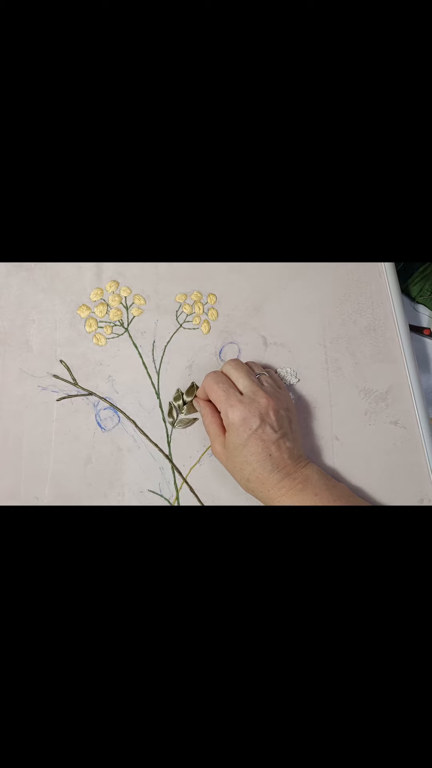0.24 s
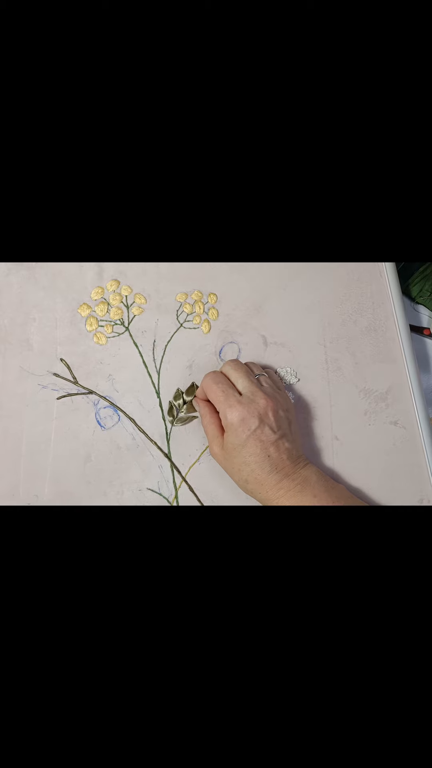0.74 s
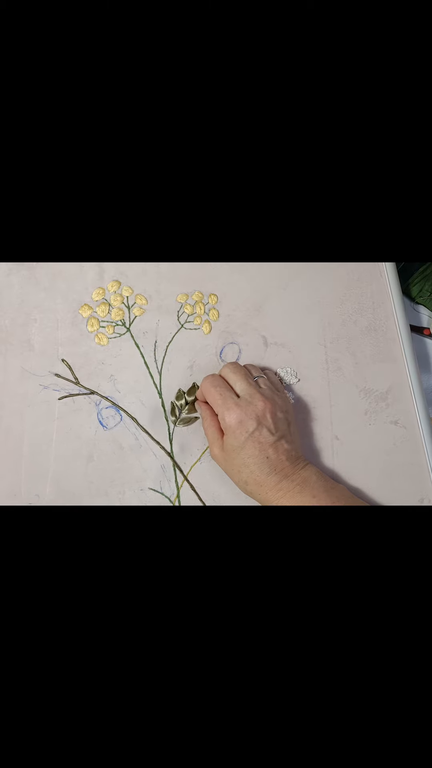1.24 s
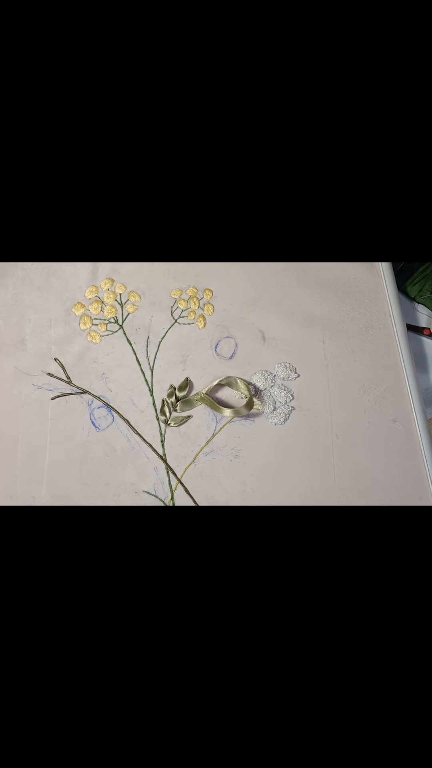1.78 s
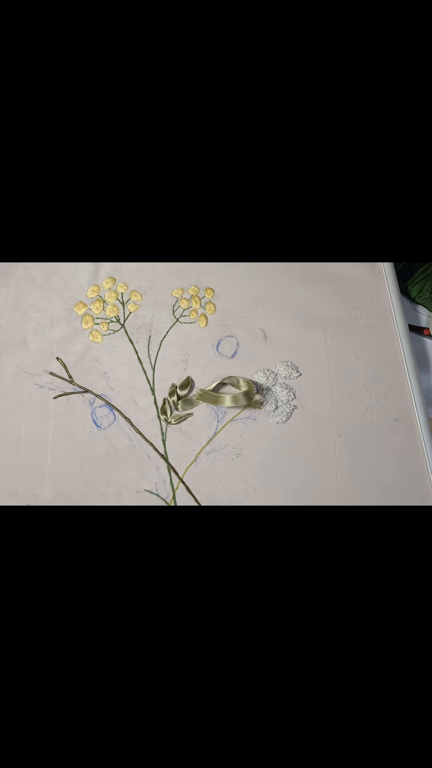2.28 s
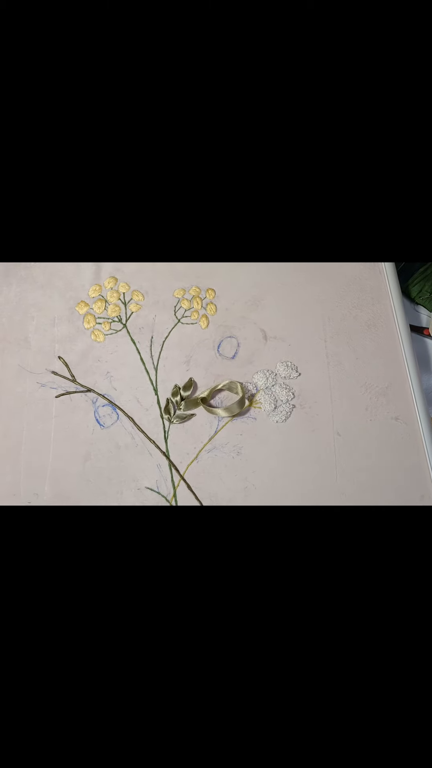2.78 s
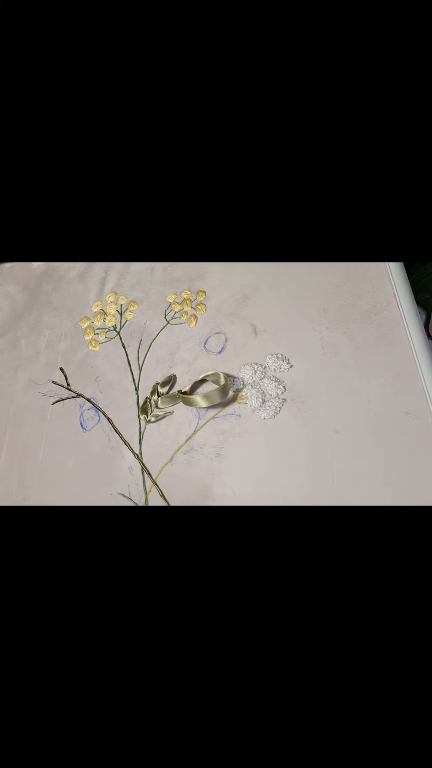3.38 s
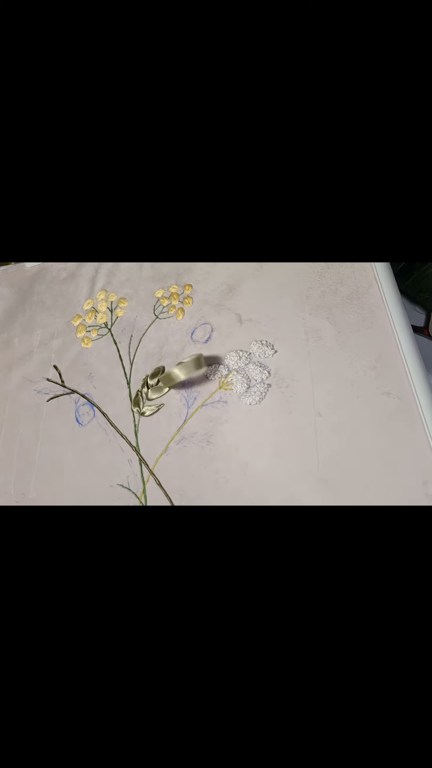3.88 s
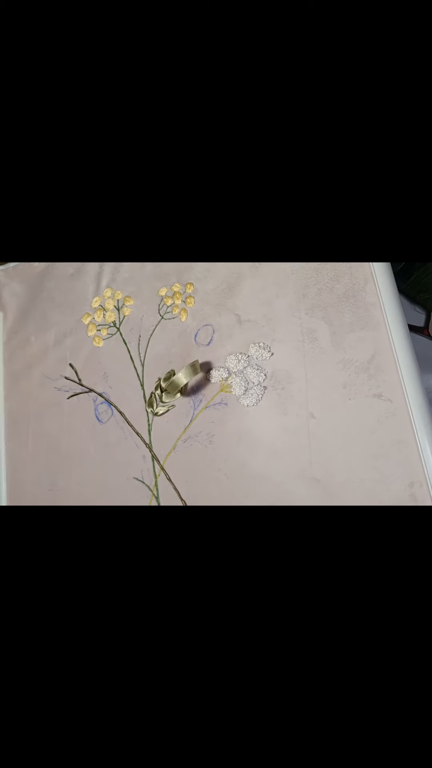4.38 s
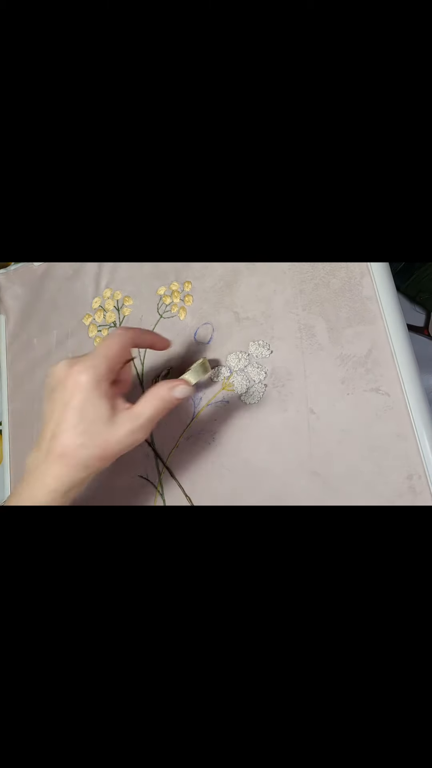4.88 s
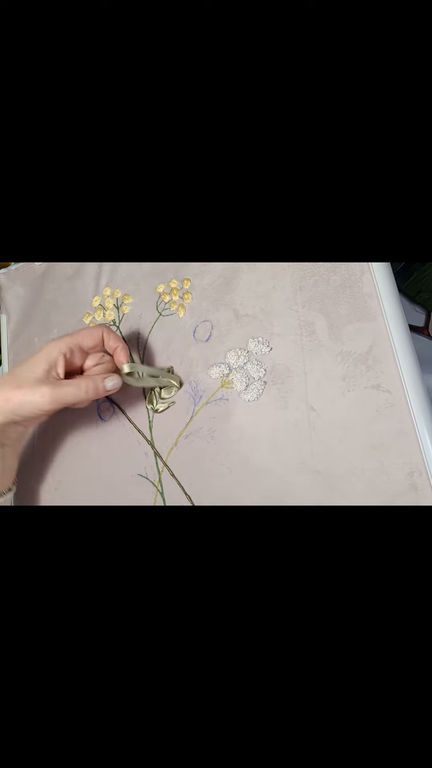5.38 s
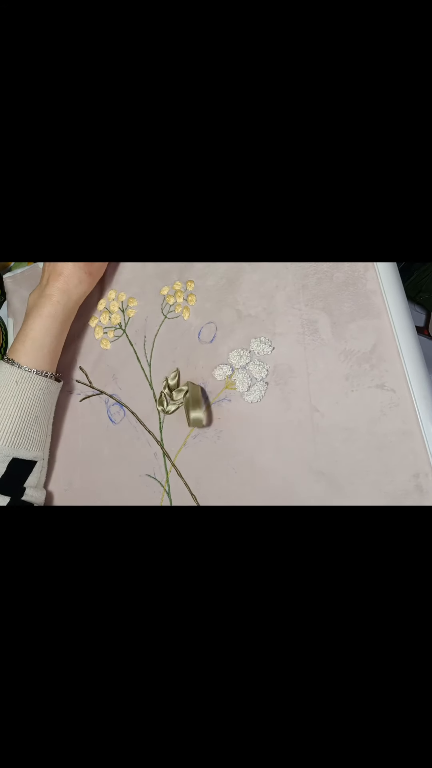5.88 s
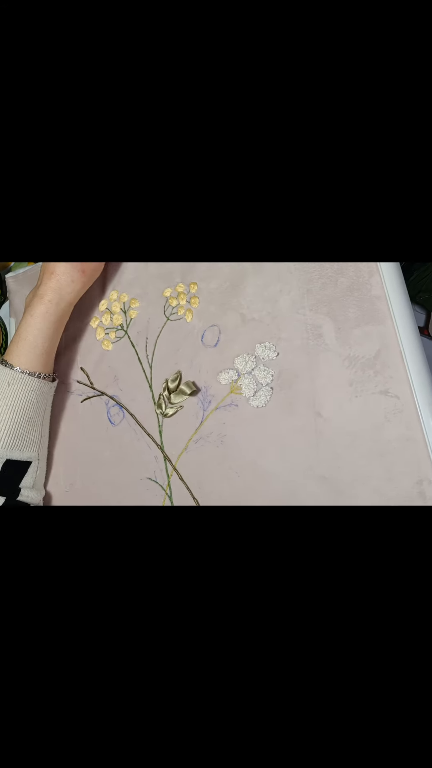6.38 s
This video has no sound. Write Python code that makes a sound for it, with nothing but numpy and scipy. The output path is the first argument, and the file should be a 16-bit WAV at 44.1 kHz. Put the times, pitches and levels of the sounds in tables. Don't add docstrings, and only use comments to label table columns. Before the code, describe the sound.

A needle works through drum-tight cloth: soft rasping brushes, one very sharp loud pop, then dull thumps and quick ribbon tugs in a quiet room.

```python
import sys
import numpy as np
from scipy import signal
from scipy.fft import rfft, irfft
from scipy.io import wavfile
from scipy.ndimage import uniform_filter1d

SR = 44100
rng = np.random.default_rng(int(sys.argv[2]) if len(sys.argv) > 2 else 0)


def volts_from_db(level):
    exponent = np.asarray(level, float) / 20
    return 10 ** exponent


def transcribe(u):
    v = np.clip(np.atleast_2d(u).T, -1, 1)
    q = np.round(v * 32767).astype(np.int16)
    wavfile.write(sys.argv[1], SR, q)


N = 292868

# pitch_hz, density_db_per_hz
PORT_HISS = [(12, -21), (20, 3.5), (49, -13.5), (163, -18), (434, -22.5), (1220, -28.5), (2820, -29.5),
             (6360, -37), (7520, -38), (15800, -41), (16600, -72.5)]
# pitch_hz, t60_s
ROOM_T60 = [(60, 0.51), (300, 0.42), (1000, 0.27), (3000, 0.26), (8000, 0.29), (16000, .18)]
# pitch_hz, likeness_0_to_1
ROOM_ALIKE = [(60, 0.83), (300, 0.82), (700, 0.27), (1500, 0.25), (16000, 0.0068)]
# pitch_hz, level_db
ROOM_DB = [(60, -5), (300, -5), (1000, -5), (3000, -4), (8000, -6.5), (16000, -9.5)]
# time_s, escape_db
ESCAPE = [(0.0, -4.5), (1.3, 0.5), (1.55, -12.5), (1.6, -3), (2.6, -7), (3.4, 2.5), (3.47, -2.2), (5.7, -2),
          (6.64, -1.5)]
# direct_lag_samples, level_db, glance_lag_samples, glance_share
PORTS = [
    (5, -1.2, 10, .3),
    (0, 1.2, 8, .3),
]

# pitch_hz, density_db_per_hz
SWAY_COLOUR = [(15, 7), (30, -8.5), (70, -4.5), (150, -13.5), (300, -14), (20000, -99)]
RUB_COLOUR = [(60, -10), (180, -8), (300, -5.5), (500, 4), (800, -6.5), (1300, -27), (20000, -101.5)]
RASP_COLOUR = [(400, -18), (1000, -3.5), (2000, -4.5), (3300, 3), (5000, -7), (7000, -19), (20000, -58)]
FIBRE_COLOUR = [(3000, -13), (5800, -7.5), (7500, 2), (8800, -9.5), (11000, -14), (16000, -11.5),
                (20000, -51.5)]
# start_s, length_s, rub_db
PRESSES = [(0.508, 0.085, -64.5), (0.676, 0.13, -74), (0.858, 0.09, -57), (0.942, 0.08, -56.5),
           (1.202, 0.2, -65), (1.355, 0.13, -76), (1.877, 0.45, -75), (2.337, 0.24, -64), (2.55, 0.2, -67),
           (2.94, 0.33, -68), (3.347, 0.33, -55.5), (3.502, 0.19, -55), (3.7, 0.71, -70),
           (4.286, .3, -67.5), (5.142, 0.44, -71), (5.716, 0.27, -65), (5.903, 0.1, -54.5),
           (6.037, 0.14, -57), (6.098, 0.14, -48.5), (6.373, 0.18, -60.5), (6.546, .14, -59)]
# start_s, length_s, fibre_db, pressure_db (deepens hiss to rasp)
STROKES = [(0.171, 0.21, -72.5, -24), (0.437, .08, -83, -14), (0.527, 0.096, -74.5, -19),
           (0.633, 0.16, -71.5, -2.5), (0.842, 0.12, -65, 1), (0.943, 0.069, -71, 4), (1.053, 0.13, -65, 0),
           (1.218, 0.12, -64.5, -3.5), (1.395, .17, -65, 0.5), (1.564, 0.058, -70, 2),
           (1.646, .14, -70.5, -21), (2.357, 0.15, -77.5, 3.5), (2.863, 0.43, -74, 4),
           (3.356, 0.32, -65, -1), (3.49, 0.24, -68.5, -20), (3.607, 0.51, -74.5, 3.5),
           (3.926, 0.43, -70.5, 0), (4.31, 0.23, -67, 2.5), (4.69, .16, -77, -12.5), (5.039, .12, -70, -14),
           (5.157, 0.38, -72, -2.5), (5.49, 0.24, -80, -2), (5.692, .16, -69, -1),
           (5.831, 0.18, -66.5, 3.5), (5.97, 0.09, -62, -6), (6.383, 0.38, -71.5, 2.5)]
# start_s, end_s, rub_db, rasp_db, fibre_db
TUGS = [
    (1.349, 1.416, -49.5, -52.5, -70),
    (1.846, 1.904, -77, -65, -63.5),
    (2.538, 2.556, -60, -74, -60.5),
    (3.483, 3.533, -47.5, -59, -66),
    (3.572, 3.632, -56, -89, -101),
    (6.021, 6.075, -54, -64, -58),
    (6.131, 6.215, -53.5, -70, -56),
    (6.223, 6.244, -61, -85, -87.5),
    (6.327, 6.374, -51, -67, -59),
]

# pitch_hz, level_db,
# t60_s
CLOTH = [(251.6, -10.5, 0.089), (296, -5, 0.071), (390, 4.5, 0.026), (501.7, 0.5, 0.047), (618, 8, 0.023),
         (855, -2.5, 0.086)]
WEAVE = [(1037, -6.5, 0.019), (1108, -4, 0.018), (1348, 1.5, 0.015), (1690, -3, 0.02), (2570, -2, 0.0075),
         (2934, 18, 0.0021), (3770, 0, 0.0038)]
NEEDLE = [(2900, -2, .004), (3700, -3, .004), (4500, -2, .004), (5800, -4, .003), (7500, 0, .005),
          (8800, -6, .003), (11000, -16, .002)]
# start_s, peak_db, pitch_hz, t60_s
THUMPS = [(0.165, -83, 101, 0.13), (0.715, -55.5, 40.7, 0.19), (0.908, -51.5, 55, 0.071),
          (0.954, -49, 109.3, 0.13), (1.123, -55.5, 195, 0.061), (1.142, -43.5, 39.7, 0.075),
          (1.339, -58, 161.5, 0.36), (1.441, -47, 43.1, 0.068), (1.591, -45.5, 121, 0.13),
          (1.857, -41, 87, 0.067), (1.87, -41.5, 101, 0.063), (2.217, -67, 48.7, 0.069),
          (2.543, -44, 79.6, 0.06), (2.685, -54, 145.6, 0.051), (3.142, -48.5, 96, 0.037),
          (3.474, -42, 84, 0.2), (3.527, -41.5, 68.4, 0.07), (3.58, -38, 70, 0.06),
          (3.61, -51, 40.4, 0.083), (4.023, -57.5, 95, 0.13), (4.192, -73, 139, 0.17),
          (4.446, -61, 197, 0.071), (5.731, -49.5, 97, 0.048), (5.782, -47, 46.3, 0.061),
          (5.928, -43, 103, 0.045), (6.047, -48, 195, 0.08), (6.163, -43.5, 52, 0.1),
          (6.317, -48, 97, 0.046), (6.548, -51, 99, 0.086), (6.61, -53.5, 132, 0.17)]
# start_s, cloth_peak_db, cloth_pitch_hz
NUDGES = [(0.343, -57, 402), (0.606, -49.5, 383), (0.694, -55.5, 280), (0.838, -58, 295),
          (2.404, -54.5, 397), (2.485, -55, 290), (2.706, -50, 297), (3.023, -52, 457), (3.891, -50, 382),
          (4.035, -51, 282), (4.73, -62, 350), (4.899, -58, 352), (5.09, -57.5, 400), (5.64, -57, 390),
          (5.733, -55, 207), (5.774, -48, 335), (5.866, -52, 345), (6.612, -48, 263)]
# start_s, cloth_peak_db, cloth_pitch_hz, weave_knock_db, needle_tick_db
POKES = [(0.954, -37.5, 296, -43.5, -48.5), (1.122, -43.5, 307, -52.5, -54), (1.592, -37, 483, -43, -63),
         (1.842, -50.5, 414, -61.5, -38), (1.868, -32.5, 267, -60, -64), (1.88, -51, 328, -66, -44.5),
         (1.888, -40, 252, -54, -47), (2.545, -43.5, 404, -47, -65), (2.69, -39.5, 390, -52.5, -65),
         (3.468, -53, 202, -47, -70), (3.482, -31, 390, -25, -65), (3.503, -37.5, 274, -61, -60),
         (3.576, -30, 480, -30.5, -59), (4.078, -45, 355, -49, -73), (4.174, -47.5, 350, -51.5, -73),
         (4.206, -46, 372, -53, -74), (5.929, -40.5, 530, -50.5, -53), (6.035, -44, 520, -74, -51),
         (6.044, -27.5, 420, -36.5, -35), (6.123, -39, 417, -43, -45.5), (6.181, -46, 458, -44, -41),
         (6.318, -39.5, 620, -41, -64), (6.546, -44.5, 229, -56, -61)]
# peak_db, push_ms, recoil_ms, recoil_share, tick_db, ring_db
POP = (-8, 0.48, 1.25, 0.5, -21.5, -26.5)


def read(table, hz):
    f, v = np.transpose(table)
    return np.interp(np.log(np.maximum(hz, 1)), np.log(f), v)


def unit(x):
    return x / np.sqrt(np.mean(x ** 2))


def colour(x, table):
    gain = volts_from_db(read(table, np.fft.rfftfreq(N, 1 / SR)))
    return unit(irfft(rfft(x) * gain, N))


def walk(rate):
    hold = int(SR / rate)
    levels = np.repeat(rng.standard_normal(N // hold + 1), hold)
    return unit(uniform_filter1d(levels, hold)[:N])


def add(out, s, blow):
    i = int(s * SR)
    out[i:i + len(blow)] += blow


def near(modes, hz, db_per_octave):
    return [(f, db - db_per_octave * abs(np.log2(f / hz)), t60) for f, db, t60 in modes]


def ring(modes, contact_s, detune, scatter_db):
    hz, db, t60 = np.array(modes, float).T[:, :, None]
    t = np.arange(SR // 4) / SR
    level_chance, pitch_chance, phase_chance = rng.standard_normal((3, len(modes), 1))
    onset = 1 - np.exp(-t / np.clip(contact_s, 5e-5, .02))
    decay = np.exp(-np.log(1000) * t / t60)
    tone = np.sin(2 * np.pi * hz * (1 + detune * pitch_chance) * t + .5 * phase_chance)
    y = (volts_from_db(db + scatter_db * level_chance) * onset * decay * tone).sum(axis=0)
    return y / np.abs(y).max()


def crack(top_hz):
    t = np.arange(SR // 50) / SR
    y = rng.standard_normal(len(t)) * np.exp(-np.log(1000) * t / .005)
    y = signal.sosfilt(signal.butter(2, [600, top_hz], "band", fs=SR, output="sos"), y)
    return y / np.abs(y).max()


def port_hiss():
    hiss = np.array([colour(rng.standard_normal(N), PORT_HISS) for _ in PORTS])
    return volts_from_db(-65.0) * hiss * volts_from_db([[-.6], [.6]])


def room(x):
    t, tail = np.arange(SR // 2) / SR, 0
    rise = np.clip((t - .002) / .006, 0, 1) * volts_from_db(1.8 * walk(300)[:len(t)])
    for hz in 45 * 2 ** np.arange(0, 8.6, .5):
        sos = signal.butter(2, [hz / 2 ** .25, hz * 2 ** .25], "band", fs=SR, output="sos")
        mid, side = signal.sosfilt(sos, rng.standard_normal((2, len(t))))
        alike = np.clip(read(ROOM_ALIKE, hz), 0, 1)
        pair = np.sqrt(1 + alike) * mid + np.sqrt(1 - alike) * side * np.array([[1], [-1]])
        decay = rise * np.exp(-np.log(1000) * t / read(ROOM_T60, hz))
        tail = tail + volts_from_db(read(ROOM_DB, hz)) * pair * decay / np.sqrt(2 * np.sum(decay ** 2))
    return signal.fftconvolve(x[None], tail, axes=1)[:, :N]


def swells(starts, lengths, levels_db):
    power = np.zeros(N + SR)
    for s, length, db in zip(starts, lengths, levels_db):
        arch = np.sin(np.pi * np.linspace(0, 1, int(length * SR))[1:-1])
        add(power, s, (volts_from_db(db) * arch ** 0.76) ** 2)
    return np.sqrt(power[:N])


def tugged(column):
    gain = np.zeros(N)
    for row in TUGS:
        gain[int(row[0] * SR):int(row[1] * SR)] = volts_from_db(row[column])
    return uniform_filter1d(gain, SR // 120)


def grains(rate, spread_db):
    clicks = (rng.random(N) < rate / SR) * rng.standard_normal(N)
    return clicks * volts_from_db(spread_db * np.minimum(rng.exponential(size=N), 3))


def frame_sway():
    lean, span, rub_db = np.transpose(PRESSES)
    gain = volts_from_db(-67.5) + swells(lean, span, rub_db - 1.5)
    return gain * volts_from_db(2.9 * walk(5.7)) * colour(rng.standard_normal(N), SWAY_COLOUR)


def drag():
    start, length, hiss_db, pressure_db = np.transpose(STROKES)
    lean, span, rub_db = np.transpose(PRESSES)
    slip = volts_from_db(np.clip(2.5 * walk(35), -6, 4))
    rub = volts_from_db(-86) + swells(lean, span, rub_db - 7.5) + tugged(column=2)
    rasp = volts_from_db(-91.5) + swells(start, length, hiss_db + pressure_db + 1.5) + tugged(column=3)
    fibre = volts_from_db(-92) + swells(start, length, hiss_db) + tugged(column=4)
    rub = rub * colour(grains(500, spread_db=2.0), RUB_COLOUR)
    rasp = rasp * colour(grains(4000, spread_db=5.0), RASP_COLOUR)
    close = fibre * colour(grains(9000, spread_db=0.0), FIBRE_COLOUR)
    wide = fibre * colour(grains(9000, spread_db=0.0), FIBRE_COLOUR)
    return slip * (rub + rasp + close), .7 * slip * wide


def thumps():
    out = np.zeros(N + SR)
    for s, db, hz, t60 in THUMPS:
        modes = [(hz, 0, t60), (1.6 * hz, -5, .7 * t60)]
        add(out, s, volts_from_db(db + 1.5) * ring(modes, .006, detune=.02, scatter_db=1.5))
    return out[:N]


def pokes():
    contact_s, peak_lag_s = 0.0017, .0014
    nudges = [(s, db, hz, db - 16.5, db - 19) for s, db, hz in NUDGES]
    out = np.zeros(N + SR)
    for s, cloth_db, cloth_hz, weave_db, tick_db in POKES + nudges:
        cloth = near(CLOTH, cloth_hz, 15.2)
        weave = near(WEAVE, 3.2 * cloth_hz, 3.)
        blow = volts_from_db(cloth_db) * ring(cloth, contact_s, detune=.03, scatter_db=2)
        blow += volts_from_db(weave_db + 8) * ring(weave, contact_s / 4, detune=.04, scatter_db=2)
        blow += volts_from_db(tick_db + 12) * ring(NEEDLE, contact_s / 6, detune=.05, scatter_db=2.5)
        add(out, s + peak_lag_s, blow)
        add(out, s + peak_lag_s, volts_from_db(weave_db + 3.5) * crack(top_hz=3320))
    return out[:N]


def half_swing(ms, skew):
    return np.sin(np.pi * np.linspace(0, 1, int(ms * SR / 1000)) ** skew).clip(0)


def pop():
    pop_s = 1.33985
    db, push_ms, recoil_ms, share, tick_db, ring_db = POP
    out = np.zeros(N + SR)
    up, down = half_swing(push_ms, 1), half_swing(recoil_ms, .7)
    rebound = down[::2]
    add(out, pop_s, volts_from_db(db) * np.r_[up ** 1.5, -share * down ** .8, .22 * rebound, -.12 * rebound])
    add(out, pop_s, volts_from_db(tick_db) * ring(NEEDLE[:6], .0003, detune=.03, scatter_db=1.5))
    add(out, pop_s, volts_from_db(ring_db) * ring(near(CLOTH, 336, 9), .002, detune=.01, scatter_db=1.5))
    add(out, pop_s, volts_from_db(-14.5) * crack(top_hz=4150))
    add(out, pop_s, volts_from_db(-25) * ring(near(WEAVE, 1046, 12), .0002, detune=.01, scatter_db=1.5))
    return out[:N]


def at_ports(work):
    heard = []
    for lag, db, glance_lag, share in PORTS:
        both = np.roll(work, lag) + share * np.roll(work, glance_lag)
        heard.append(volts_from_db(db) * both / (1 + share))
    return np.array(heard)


def scene():
    sliding, scattered = drag()
    work = frame_sway() + sliding + thumps() + pokes() + pop()
    escape = volts_from_db(np.interp(np.arange(N) / SR, *np.transpose(ESCAPE)))
    answer = room(work * escape) * volts_from_db([[-.8], [.8]])
    return at_ports(work) + scattered * np.array([[1], [-1]]) + answer


def roll_off(x):
    return signal.sosfilt(signal.butter(12, 16530, fs=SR, output="sos"), x)


def record(dry):
    heard = dry + port_hiss()
    heard = signal.sosfiltfilt(signal.ellip(8, .1, 30, 15750, fs=SR, output="sos"), heard)
    return roll_off(heard)


dry = scene()
out = record(dry)
transcribe(out)
```